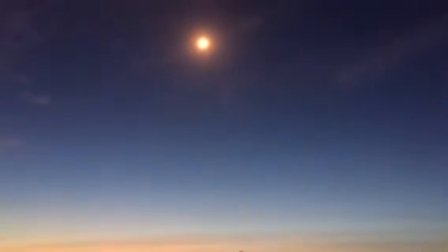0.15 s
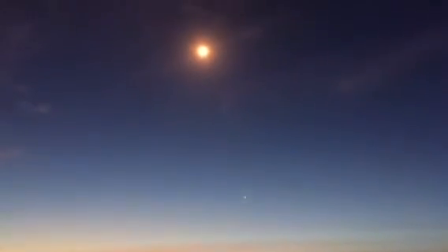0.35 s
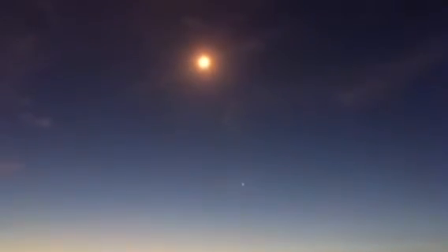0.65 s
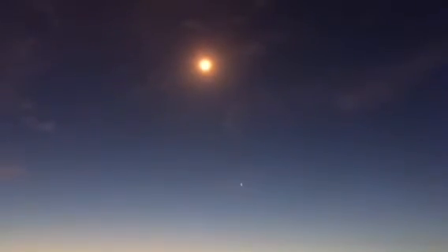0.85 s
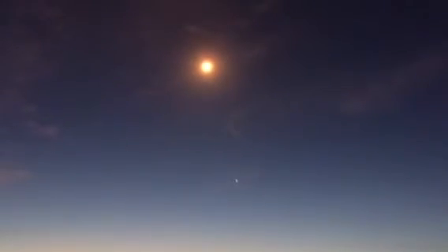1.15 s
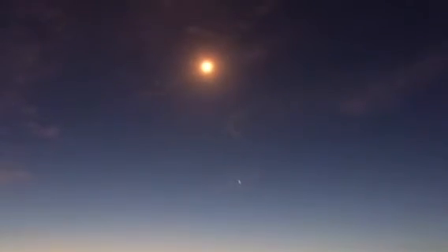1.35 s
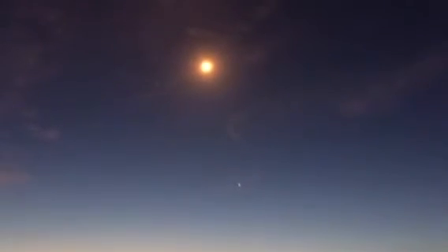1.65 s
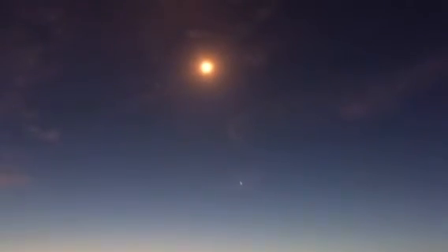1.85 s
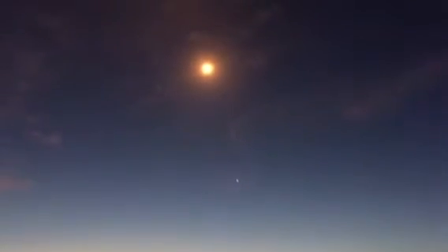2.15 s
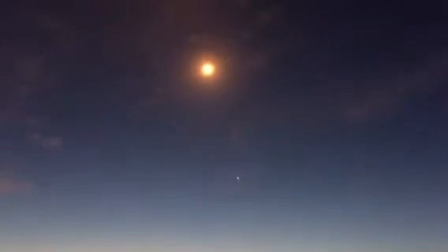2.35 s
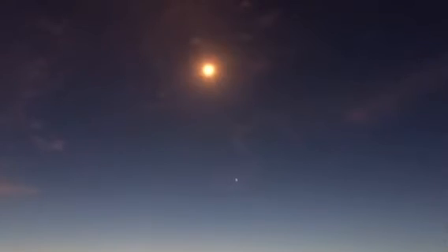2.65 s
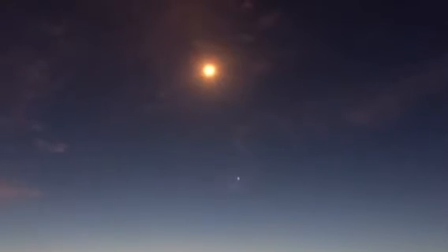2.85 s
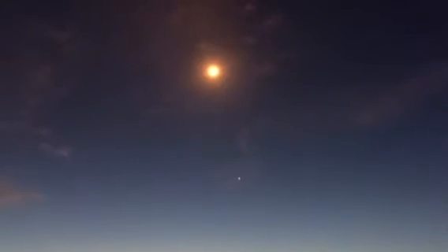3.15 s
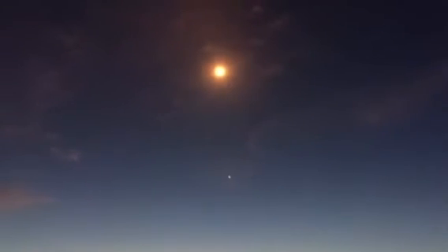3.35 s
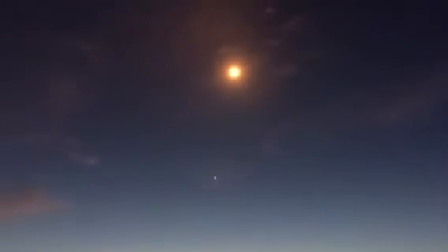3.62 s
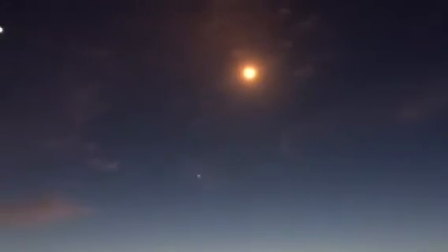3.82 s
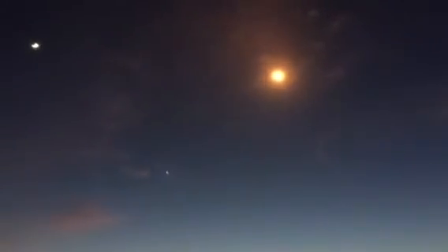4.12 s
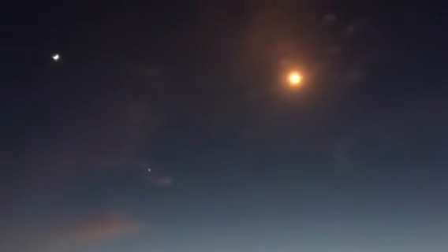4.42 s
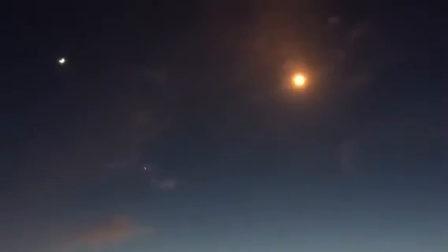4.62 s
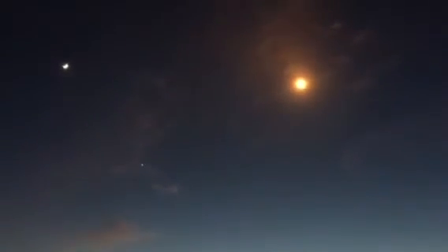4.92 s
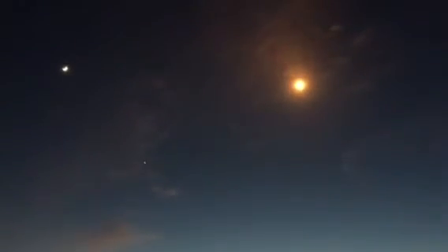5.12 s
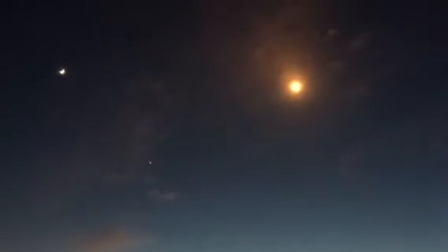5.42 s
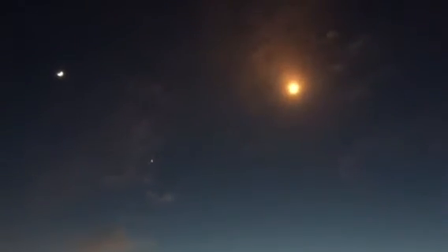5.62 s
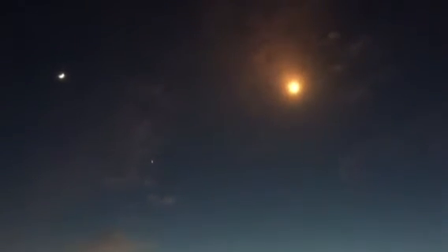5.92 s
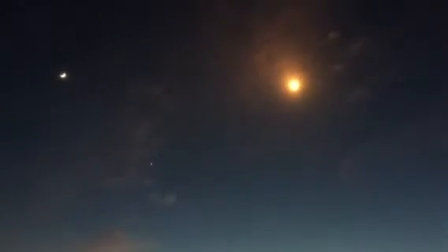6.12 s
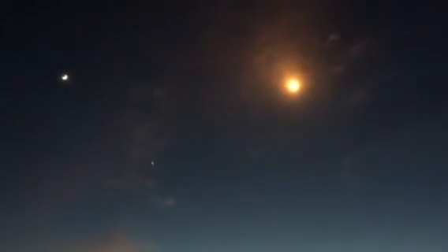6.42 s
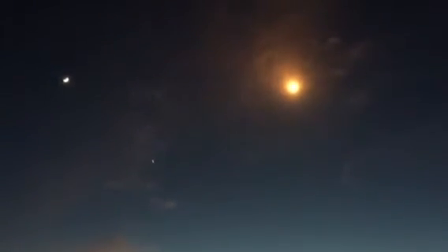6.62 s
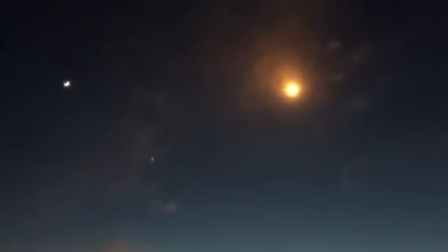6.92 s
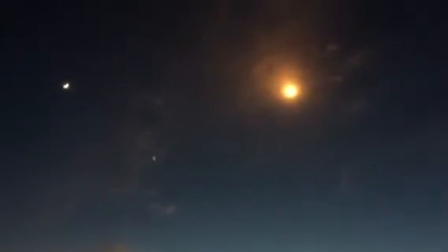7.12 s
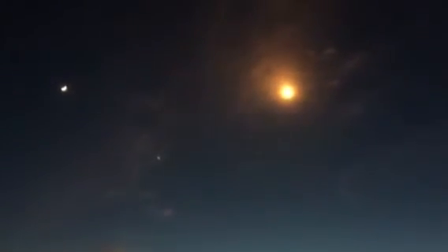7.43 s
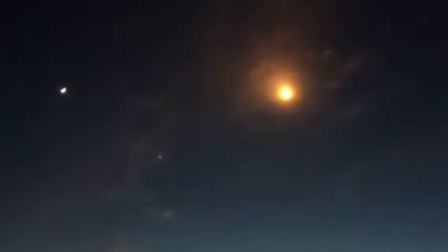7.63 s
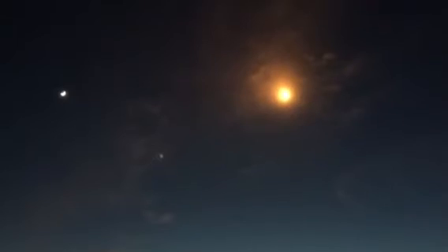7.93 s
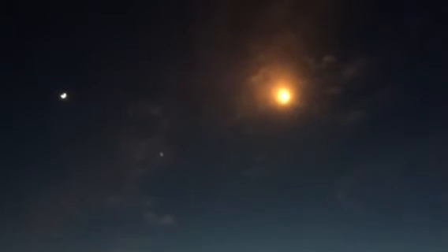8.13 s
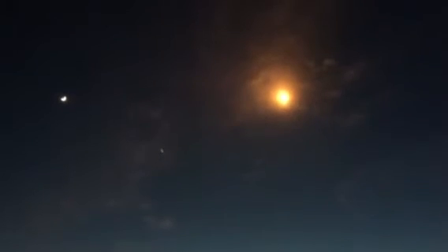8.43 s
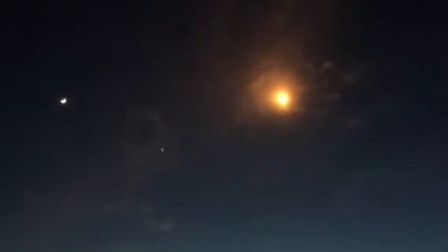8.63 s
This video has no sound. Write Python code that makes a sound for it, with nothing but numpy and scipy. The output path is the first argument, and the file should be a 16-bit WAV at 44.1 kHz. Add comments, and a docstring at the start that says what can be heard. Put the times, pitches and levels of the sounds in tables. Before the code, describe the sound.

Outdoors, a rocket climbing far away gives a deep, steady, growing rumble under a lumpy roar. The roar swells to about four seconds, sags, then rises twice more more weakly, with dull pops and low thumps, strongest right at the end. Close to the hand-held camera microphone, a faint two-tone whine, tiny squeaks and a thin zoom whir that speeds up and stops before seven seconds.

```python
"""A deep rumble and a roar swell and sag: a rocket far off, heard outdoors through a hand-held camera.
Coloured noise makes the rumble; trains of random shocks, blunted by air that soaks up the treble, make
the roar and a rasp. Dull crackling pops stand out, the strongest near the end.
Close by, the camera whines faintly in two fuzzy tones, ticks, squeaks and is softly scraped;
its zoom motor, gear shocks and narrow noise bands, whirs, speeds up and stops."""
import sys
import numpy as np
from scipy import signal
from scipy.fft import rfft, irfft, next_fast_len
from scipy.io import wavfile
from scipy.ndimage import uniform_filter1d, map_coordinates

SR = 44100
rng = np.random.default_rng(int(sys.argv[2]) if len(sys.argv) > 2 else 0)


def wav_out(sig):
    """Save sig, one row per channel (or a flat mono array), as 16-bit PCM at SR to the path in sys.argv[1]."""
    wavfile.write(sys.argv[1], SR, np.round(np.clip(np.atleast_2d(sig).T, -1, 1) * 32767).astype(np.int16))


N = 386757
TIME = np.arange(N) / SR


def exhaust():
    """Big eddies rumble; smaller ones send shocks that the long path blunts to a roar and a rasp."""
    # Spectra that drift. Each row: frequency in Hz, early and late relative level in dB per Hz.
    rumble_colour = [(17.1, -63.5, -61.5), (24.4, -43.5, -43.5), (31, -25.5, -20), (41, -11, 0.5),
                     (50, -1, -2.5), (62.6, 2.5, -2), (77.5, 0, -2), (95.8, 3, 4), (109, 0, -2.5),
                     (132.4, -1.5, -5), (156.5, -15, -17), (199, -38, -34), (390, -69, -80.5)]
    roar_colour = [(100, -24, -24.5), (138.5, 2, -4), (157.7, -11.5, -12), (175.5, 6, 2),
                   (193.3, -7.5, -2.5), (216.7, 3.5, 2.5), (231, -7, -2.5), (262.5, -11, -1),
                   (303, -23, -13), (361, -25, -16.5), (412, -30, -36), (585, -54.5, -57),
                   (1180, -87.5, -83)]
    # Rasp spectrum. Each row: frequency in Hz, relative level in dB per Hz.
    rasp_colour = [(180, -30), (300, 1), (385, -1), (435, 3.5), (505, 2.5), (555, -6), (630, 4), (700, -2),
                   (770, -9.5), (880, -9.5), (1200, -29), (2000, -35.5), (4000, -55.5)]
    # Long swells of exhaust noise. Each row: top in seconds, fall in seconds, roar level in dB,
    # roar rise in seconds, rasp level in dB, rasp rise in seconds; levels before lumps and flutter.
    swell_rows = [(4.1, 1.026, -33, 1.66, -48.5, 0.61), (6.95, 0.46, -37.5, 0.71, -56.5, 1),
                  (8.65, 0.44, -37.5, 0.85, -52.5, 0.24)]
    roar_rest_db, rasp_rest_db = -45.5, -66  # between the swells
    rasp_fall_ratio = 1.01  # to the roar's fall time
    rumble_follows = 0.088  # share of the roar's swells, in dB
    rasp_follows = 0.38  # share of the roar's lumps, in dB

    rumble = steadied(climbing(rng.standard_normal(N), rumble_colour), span_s=0.14)
    roar = steadied(climbing(shocks(per_s=1500, spread_db=3.0), roar_colour), span_s=0.1)
    fronts = shocks(per_s=1100, spread_db=2.5)
    # an echo repeats each front and ripples the spectrum
    fronts = fronts + 0.2 * np.roll(fronts, int(.0227 * SR))
    rasp = coloured(fronts, rasp_colour)
    rasp = steadied(wavering(rasp, patchy_db=1.2), span_s=.15)

    top_s, fall_s, roar_db, roar_rise_s, rasp_db, rasp_rise_s = np.transpose(swell_rows)
    roar_gain = swells(top_s, roar_db, roar_rise_s, fall_s, roar_rest_db)
    rasp_gain = swells(top_s, rasp_db, rasp_rise_s, rasp_fall_ratio * fall_s, rasp_rest_db)
    roar_over_rest = roar_gain / gain_of(roar_rest_db)
    rumble_gain = growth() * roar_over_rest ** rumble_follows
    rumble_lumps, roar_lumps = lumps()

    rumble = rumble * rumble_gain * rumble_lumps * flutter(depth_db=0.5)
    roar = roar * roar_gain * roar_lumps * flutter(depth_db=0.77)
    rasp = rasp * rasp_gain * roar_lumps ** rasp_follows
    return rumble + roar + rasp


def climbing(x, rows):
    """One pressure wave whose colour moves between early and late as the rocket climbs."""
    # Each row: time in seconds, share of the late colour 0-1.
    climb = [(0, 0.35), (3.3, 0.06), (4.2, 0.31), (5.1, 0.04), (6.1, 0.9), (7.8, 0.5), (8.77, 0.7)]
    hz, early_db, late_db = np.transpose(rows)
    late = np.clip(curves(climb)[0], 0, 1)
    early_sound = coloured(x, np.c_[hz, early_db])
    late_sound = coloured(x, np.c_[hz, late_db])
    return (1 - late) * early_sound + late * late_sound


def swells(tops_s, tops_db, rises_s, falls_s, rest_db):
    """Gain that climbs along a bell from rest to the top of each swell, holds and falls back."""
    fall_squareness = 2.6  # above 2, the top holds longer and then drops faster
    power = gain_of(rest_db) ** 2
    for top_s, db, rise_s, fall_s in zip(tops_s, tops_db, rises_s, falls_s):
        rising = ((top_s - TIME) / rise_s) ** 2
        falling = abs((TIME - top_s) / fall_s) ** fall_squareness
        away = np.where(TIME < top_s, rising, falling)
        power = power + gain_of(db) ** 2 * np.exp(-away)
    return np.sqrt(power)


def growth():
    """Gain of the deep rumble: a steady climb, and a late step as a stronger wave of noise arrives."""
    start_db, growth_db_per_s = -33.5, 0.6477
    surge_s, surge_db, surge_rise_s = 7.87, 3.5, .05
    surge = .5 + .5 * np.tanh((TIME - surge_s) / surge_rise_s)
    return gain_of(start_db + growth_db_per_s * TIME + surge_db * surge)


def lumps():
    """Gains of rumble and roar through brief surges and lulls, as turbulent air bends the sound."""
    # Each row: centre in seconds, half-width in seconds, rumble change in dB, roar change in dB.
    lump_rows = [(0.62, 0.041, -4, -3.5), (0.74, 0.036, 2.5, 3.5), (1.13, 0.04, 2, 3), (1.62, 0.053, 2, -2),
                 (1.87, 0.088, 3.5, -3.5), (2.3, 0.032, -2.5, 5), (2.83, 0.031, 4.5, -8.5),
                 (3.06, 0.018, 8.5, 0), (3.15, 0.035, 1, 5), (3.25, 0.019, -13, -9),
                 (3.39, 0.022, -12.5, -2.5), (3.61, 0.023, 3.5, 4), (3.73, 0.077, -4, -1),
                 (3.86, 0.017, 6.5, 3), (4.02, 0.038, 0, 3), (4.16, 0.039, 0.5, 0),
                 (4.279, 0.042, 2.5, -7.5), (4.9, 0.037, 1.5, 2.5), (5.4, .05, 4, 1), (5.66, 0.019, -4, -5),
                 (6.39, 0.045, 4, 0.5), (6.77, .05, 3, 3.5), (7.4, 0.37, 0, 1), (7.03, 0.08, 2.5, 2.5),
                 (7.79, 0.041, -3.5, 1.5), (8.02, 0.044, 3.5, -4), (8.16, 0.05, -5.5, -3.5),
                 (8.295, 0.025, 3.5, 0.5), (8.44, 0.059, -0.5, 1), (8.61, 0.0079, -8, 0),
                 (8.672, 0.017, 5.5, 2.5), (8.705, 0.013, 3.5, 9), (8.735, 0.018, 0.5, 2.5)]
    centre_s, width_s, rumble_db, roar_db = np.transpose(lump_rows)
    t = TIME[::64]
    bells = np.exp(-((t[:, None] - centre_s) / width_s) ** 2)
    return [gain_of(np.interp(TIME, t, bells @ db)) for db in (rumble_db, roar_db)]


def sizzle():
    """Just past the crest of the first swell, steeper shocks get through and brighten the rasp."""
    # Each row: frequency in Hz, relative level in dB per Hz.
    sizzle_colour = [(500, -6.5), (700, -4), (850, 4), (1050, -7.5), (1300, -5.5), (2000, -26)]
    top_s, width_s, top_db = 4.75, .85, -59.5
    fronts = steadied(coloured(shocks(per_s=1800, spread_db=2.5), sizzle_colour), span_s=.2)
    bell = np.exp(-((TIME - top_s) / width_s) ** 2)
    return gain_of(top_db) * bell * fronts


def crackle():
    """The steepest shocks arrive as dull pops, some with ground echoes, each trailed by a low thump."""
    # Spectra of pop and thump. Each row: frequency in Hz, relative level in dB per Hz.
    crack_colour = [(60, -12.5), (200, 5.5), (320, -3), (390, 1.5), (490, 7.5), (690, 6), (840, -6),
                    (1000, -21.5), (1120, -16.5), (1300, -15), (1480, -27.5), (1950, -29), (4000, -60.5)]
    thump_colour = [(50, -6.5), (110, 1), (160, -9.5), (215, 2.5), (300, -10.5), (400, -33.5)]
    # Each row: start in seconds, pop peak in dB, thump peak in dB, echo strength 0-1.
    cracks = [(3.272, -43, -24, 0.05), (3.307, -43, -36, 0), (3.369, -38, -26.5, 0),
              (3.563, -37.5, -33, 0.1), (3.851, -46, -28, 0), (4.156, -34, -27, 0), (4.85, -50, -24, .03),
              (6.985, -40, -35.5, 0.18), (8.265, -43, -24.5, 0), (8.488, -33.5, -21, 0.05),
              (8.525, -42.5, -22.5, 0), (8.555, -50.5, -24.5, 0.12), (8.617, -22, -16, 0.02),
              (8.66, -34, -22.5, .03), (8.676, -35, -33, 0.03), (8.699, -44, -38, 0),
              (8.757, -34, -24, 0.05)]
    thump_lag_s = .004
    out = np.zeros(N)
    thump = blow(thump_colour, scatter=0, decay_s=1)
    for start_s, pop_db, thump_db, echoes in cracks:
        pop = blow(crack_colour, scatter=echoes, decay_s=0.019)
        add(out, start_s, gain_of(pop_db) * pop)
        add(out, start_s + thump_lag_s, gain_of(thump_db) * thump)
    return out


def zoom_motor():
    """Tiny gear teeth rattle the lens housing; the tones flutter, and shift as the motor speeds up."""
    # Each row: time in seconds, relative level in dB, share of fast running 0-1.
    zoom = [(0, -63, 0.15), (3.25, -64, 0), (3.7, -62.5, 0.54), (4.3, -62.5, 0.9), (5.2, -62.5, 1),
            (5.8, -61.5, 1), (5.98, -60.5, 0.7), (6.1, -62, 1), (6.7, -62, 1), (6.82, -66, 1),
            (6.9, -94.5, 0.92), (8.77, -100, 0.7)]
    # Gear noise. Each row: frequency in Hz, relative level in dB per Hz.
    gear_colour = [(400, -11), (900, 9), (1400, -8), (2000, -12.5), (2800, -15.5), (3600, -34.5),
                   (5200, -22.5), (6800, -32), (7800, -29.5), (12000, -47.5)]
    # Fuzzy tones. Each row: frequency in Hz, width in Hz, relative level in dB when slow, when fast.
    gear_tones = [(1436, 32, -8.5, -6), (1637, 6.7, -13, -17.5), (1800, 29, -14, -18), (2150, 69, -17, -9),
                  (2386, 40, -18.5, -24.5), (2570, 39, -18.5, -31), (2793, 31, -18, -18),
                  (2930, 25, -24, -25.5), (3070, 37, -20.5, -27.5), (3210, 33, -25.5, -24),
                  (3300, 80, -27.5, -22.5), (3540, 27, -31, -24), (3780, 100, -30.5, -30.5),
                  (3870, 37, -32.5, -25.5), (4050, 48, -26.5, -21), (4243, 60, -25, -22.5),
                  (4660, 140, -29.5, -27.5), (6020, 110, -30.5, -28.5), (6340, 90, -30, -26.5),
                  (6700, 140, -28.5, -28.5), (6960, 90, -30, -27.5), (7270, 120, -35.5, -31)]
    db, fast = curves(zoom)
    fast = np.clip(fast, 0, 1)
    hz, width_hz, slow_db, fast_db = np.transpose(gear_tones)
    slow_tones = fuzzy_tones(zip(hz, width_hz, slow_db))
    fast_tones = fuzzy_tones(zip(hz, width_hz, fast_db))
    teeth = evened(coloured(shocks(per_s=2700, spread_db=2.5), gear_colour))
    tones = unsteady(np.sqrt(1 - fast) * slow_tones + np.sqrt(fast) * fast_tones, wander=.003)
    level = gain_of(db) * flutter(depth_db=.6)
    return level * wavering(gain_of(0.3) * teeth + tones, patchy_db=2.5)


def whine():
    """The camera's own thin whine: two close fuzzy tones, unsteady in pitch and level."""
    # Each row: frequency in Hz before drift, rms level in dB before drift.
    whine_tones = [(1906, -77), (1956, -83)]
    # Slow drift. Each row: time in seconds, pitch shift in Hz, level change in dB.
    whine_drift = [(0, 2, 2.5), (3.5, 0, 4.5), (5.5, 3, -1), (8.77, 9, 0)]
    fuzz_width_hz, fuzz_db = 23, 0.5  # noise around each tone, dB relative to it
    shift_hz, drift_db = curves(whine_drift)
    tones = np.zeros(N)
    for hz, db in whine_tones:
        turns = np.cumsum(hz + shift_hz) / SR
        tones += gain_of(db) * np.sqrt(2) * np.sin(2 * np.pi * turns)
    fuzz = fuzzy_tones((hz, fuzz_width_hz, db + fuzz_db) for hz, db in whine_tones)
    return gain_of(drift_db) * flutter(depth_db=1.5) * unsteady(tones + fuzz, wander=.003)


def camera_noises():
    """Short falling squeaks of the lens drive and two ticks of the housing."""
    # Each row: centre in seconds, length in seconds, peak in dB, mid frequency in Hz.
    squeaks = [(1.14, .05, -77, 4150), (1.33, .05, -75, 4110), (1.51, .04, -76, 4080),
               (1.74, .05, -74.5, 4100), (1.92, .05, -77, 4120), (2.13, .05, -75, 4190),
               (2.654, .04, -71.5, 4080), (2.84, .05, -73, 4250), (4.246, .04, -71, 4150),
               (4.33, .04, -69, 4230), (4.47, 0.045, -75, 4230), (5.176, .036, -68, 4200),
               (5.178, 0.034, -73, 4600), (5.632, .04, -67, 4080), (5.93, .04, -67, 4100),
               (5.992, 0.04, -65.5, 4090), (6.04, 0.028, -69, 4080), (7.68, .035, -80, 4100),
               (7.71, .04, -70.5, 4100)]
    # Each row: start in seconds, peak in dB.
    ticks = [(5.317, -51), (8.572, -60)]
    # Each row: frequency in Hz, relative level in dB per Hz.
    tick_colour = [(1000, -21), (2300, -12), (2800, 10), (3100, -4), (3500, 10), (3800, 4), (4150, 1),
                   (4550, 6), (5050, -16), (6200, -12), (7500, -14), (8800, -10), (10700, -17.5),
                   (13000, -45)]
    sag_hz_per_s = 2000
    out = np.zeros(N)
    for centre_s, length_s, db, hz in squeaks:
        t = np.arange(int(length_s * SR)) / SR - length_s / 2
        turns = np.cumsum(hz - sag_hz_per_s * t) / SR
        squeak = np.hanning(len(t)) * np.sin(2 * np.pi * turns)
        add(out, centre_s - length_s / 2, gain_of(db) * squeak)
    for start_s, db in ticks:
        add(out, start_s, gain_of(db) * blow(tick_colour, scatter=0.3, decay_s=0.006))
    return out


def rubs():
    """Brief soft scrapes on the camera body: a dull rub and a thin rustle that rings the housing."""
    # Each row: centre in seconds, half-width in seconds, dull rub in dB, thin rustle in dB.
    rub_rows = [(5.98, 0.12, -62.5, -86), (7.69, .04, -80.5, -82), (7.88, 0.055, -84, -79),
                (7.98, .02, -80, -75), (8.03, 0.017, -75, -75.5)]
    # Spectra. Each row: frequency in Hz, relative level in dB per Hz.
    rub_colour = [(1400, -19), (1780, 2), (2050, 0), (2350, -15.5), (3200, -32)]
    rustle_colour = [(2500, -8.5), (3450, 3.5), (3850, -8.5), (4100, 7.5), (4400, -16), (5600, -18),
                     (6600, -2.5), (7400, -14)]
    dull = evened(coloured(shocks(per_s=2900, spread_db=3.5), rub_colour))
    thin = evened(coloured(shocks(per_s=720, spread_db=1.0), rustle_colour))
    out = np.zeros(N)
    for centre_s, width_s, dull_db, thin_db in rub_rows:
        bell = np.exp(-((TIME - centre_s) / width_s) ** 2)
        out += bell * (gain_of(dull_db) * dull + gain_of(thin_db) * thin)
    return out


def background():
    """A wavering outdoor wash and even microphone hiss."""
    # Spectra. Each row: frequency in Hz, relative level in dB per Hz.
    air_colour = [(30, -4.5), (300, 2), (450, -3), (560, 1), (720, -3), (930, -0.5), (1180, -4),
                  (1400, -5.5), (1900, -13.5), (2400, -20.5), (3500, -28.5), (4800, -35.5)]
    hiss_colour = [(1000, -2.5), (4800, -1), (6700, 1), (7700, -3.5), (9500, -1.5), (10500, -8),
                   (11200, -3.5), (15500, -7.5)]
    wash = evened(wavering(coloured(rng.standard_normal(N), air_colour), patchy_db=2.3))
    hiss = evened(coloured(rng.standard_normal(N), hiss_colour))
    return gain_of(-55.5) * wash + gain_of(-81.0) * hiss


def shocks(per_s, spread_db):
    """Random pressure impulses: many weak, a few strong."""
    size = gain_of(spread_db * np.minimum(rng.exponential(1, N), 4))
    train = size * (rng.random(N) < per_s / SR)
    return train - train.mean()


def blow(points, scatter, decay_s, size=16384):
    """One impulse and its scattered echoes, coloured, with peak 1."""
    t = np.arange(size) / SR
    push = scatter * rng.standard_normal(size) * np.exp(-t / decay_s)
    push[0] += 1
    sound = coloured(push, points)
    return sound / abs(sound).max()


def fuzzy_tones(rows):
    """Noise in narrow resonances; each row: centre in Hz, width in Hz, rms level in dB."""
    size = next_fast_len(N)
    hz = np.fft.rfftfreq(size, 1 / SR)
    power = np.zeros(len(hz))
    for centre_hz, width_hz, db in rows:
        bell = 1 / (1 + ((hz - centre_hz) / (width_hz * .75)) ** 2) ** 2
        power += gain_of(db) ** 2 * bell / bell.mean()
    return irfft(rfft(rng.standard_normal(size)) * np.sqrt(power), size)[:N]


def coloured(x, points, size=16384):
    """Minimum-phase filter with the given spectrum, so that each blow rings only after it lands."""
    f, db = np.transpose(points)
    hz = abs(np.fft.fftfreq(size, 1 / SR)) + 1
    octaves_outside = abs(np.log2(hz / np.clip(hz, f[0], f[-1])))
    level_db = np.interp(np.log(hz), np.log(f), db) - 24 * octaves_outside
    log_gain = np.log(gain_of(np.maximum(level_db, -120)))
    # the Hilbert transform of the log gain gives the minimum phase
    taps = np.fft.ifft(np.exp(np.conj(signal.hilbert(log_gain)))).real[:size // 2]
    taps *= np.hanning(size)[size // 2:]
    led_in = np.r_[x[-size // 2:], x]  # the end of x leads in, so the filter starts filled
    return signal.fftconvolve(led_in, taps)[size // 2:][:len(x)]


def wavering(x, patchy_db):
    """Patches of the spectrum rise and fall, each for a tenth of a second or so."""
    z = signal.stft(x, nperseg=1024, noverlap=768)[2]
    patches = uniform_filter1d(rng.standard_normal(z.shape), size=20, axis=1)
    patches = evened(uniform_filter1d(patches, size=4, axis=0))
    return signal.istft(z * gain_of(patchy_db * patches), nperseg=1024, noverlap=768)[1][:N]


def sway(t, low_hz, high_hz, count):
    """Sum of sines in random phase, at rms 1: a slow irregular wander."""
    hz = np.geomspace(low_hz, high_hz, count)[:, None]
    return evened(np.sin(2 * np.pi * (hz * t + rng.random((count, 1)))).sum(0))


def flutter(depth_db, count=24):
    """Gain with quick random rises and dips; depth is rms."""
    t = TIME[::128]
    return gain_of(depth_db * np.interp(TIME, t, sway(t, 2.2, 5, count)))


def unsteady(x, wander, count=16):
    """Pitch that wanders by a small rms share: playback at an uneven rate."""
    t = TIME[::128]
    rate_change = wander * np.interp(TIME, t, sway(t, 1, 10, count))
    place = np.arange(N) + np.cumsum(rate_change)
    return map_coordinates(x, [place], order=3, mode="mirror")


def steadied(x, span_s):
    """Noise held near rms 1 over every stretch of this length."""
    span = max(int(span_s * SR), 2)
    power = uniform_filter1d(uniform_filter1d(x ** 2, span), span // 2)
    return x / np.sqrt(abs(power) + 1e-20)


def evened(x):
    """Scales to rms 1."""
    return x / np.sqrt(np.mean(x ** 2) + 1e-20)


def gain_of(db):
    """Decibels to amplitude."""
    return 10 ** (np.asarray(db) / 20)


def curves(rows):
    """Each column of a time table, interpolated sample by sample."""
    s, *columns = np.transpose(rows)
    return [np.interp(TIME, s, c) for c in columns]


def add(mix, start_s, sound):
    """Mixes a sound in at a time."""
    part = mix[max(round(start_s * SR), 0):][:len(sound)]
    part += sound[:len(part)]


def scene():
    """The far rocket over the near, faint sounds."""
    rocket = exhaust() + crackle() + sizzle()
    camera = whine() + zoom_motor() + camera_noises() + rubs()
    return (rocket + background() + camera)[None]


def record(dry):
    """The recorder's band limit, with a soft start and stop."""
    edge_hz = 15750
    soft = dry * signal.windows.tukey(N, .001)
    low_pass = signal.firwin(511, edge_hz, window=("kaiser", 9), fs=SR)
    return signal.oaconvolve(soft, low_pass[None], "same")


dry = scene()
out = record(dry)
wav_out(out)
```